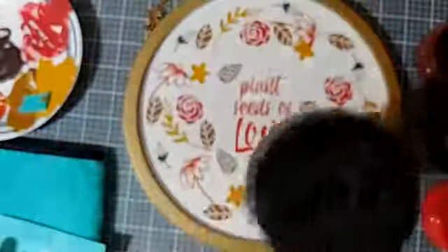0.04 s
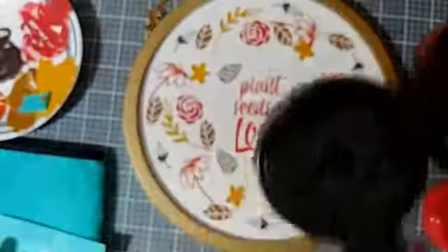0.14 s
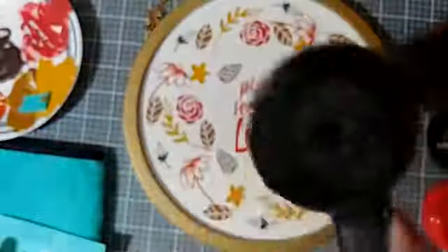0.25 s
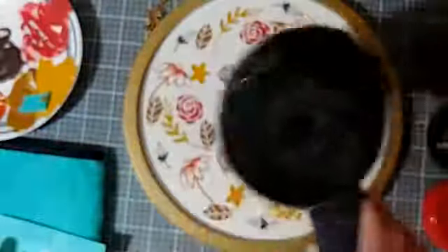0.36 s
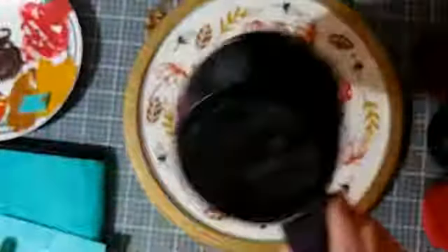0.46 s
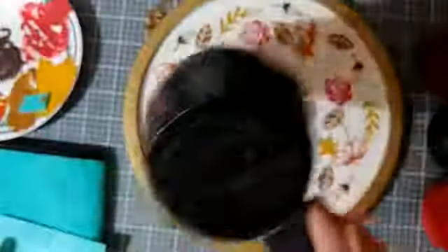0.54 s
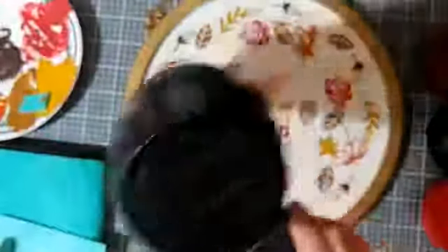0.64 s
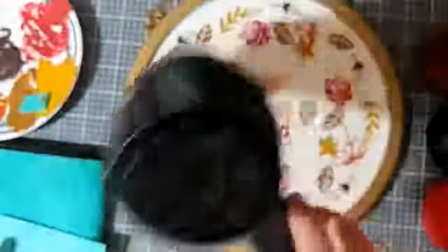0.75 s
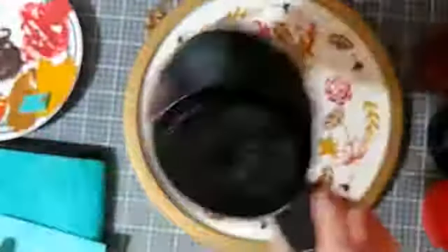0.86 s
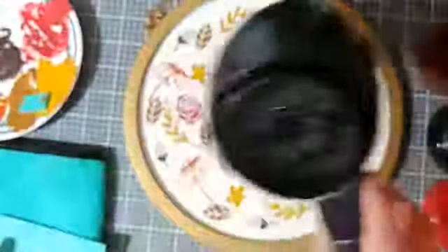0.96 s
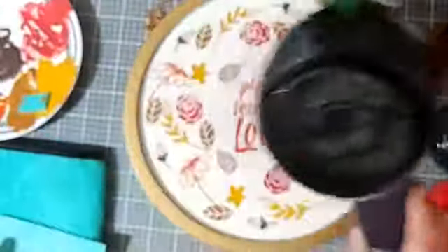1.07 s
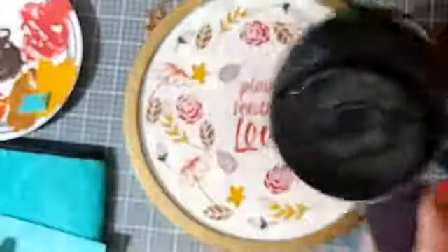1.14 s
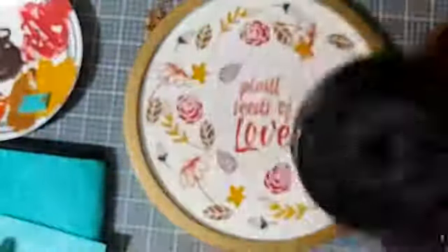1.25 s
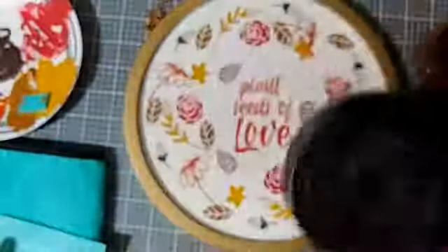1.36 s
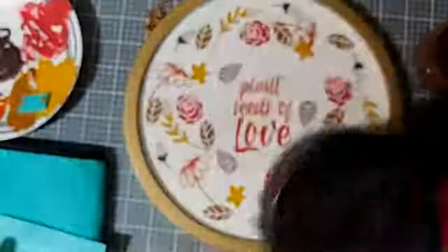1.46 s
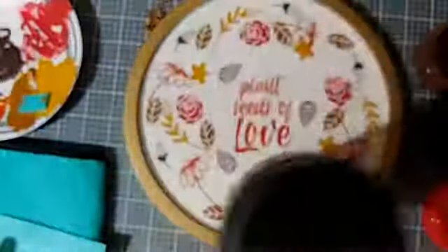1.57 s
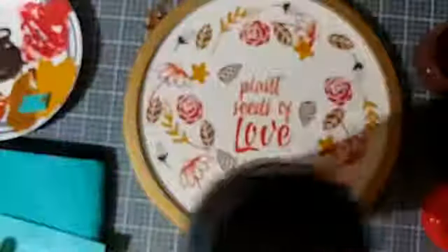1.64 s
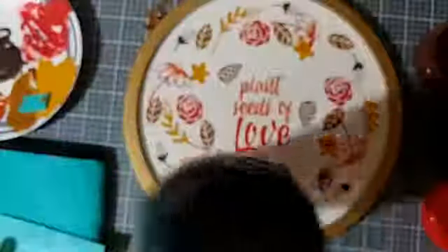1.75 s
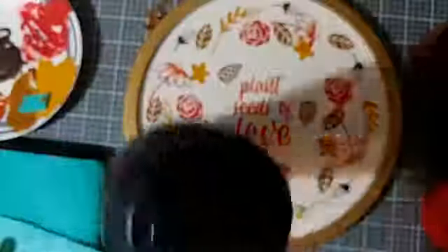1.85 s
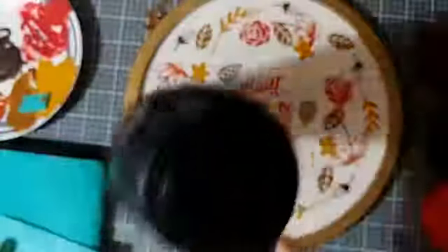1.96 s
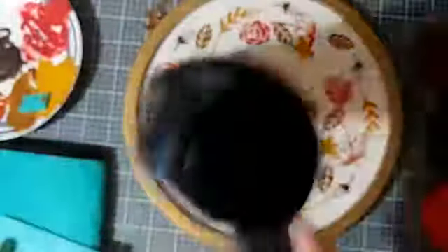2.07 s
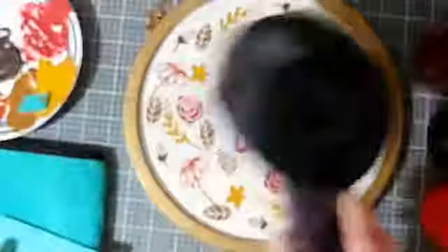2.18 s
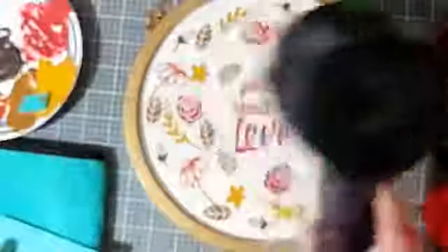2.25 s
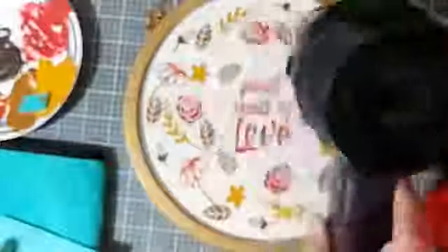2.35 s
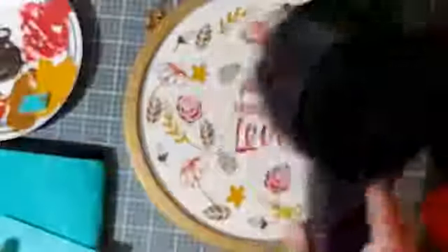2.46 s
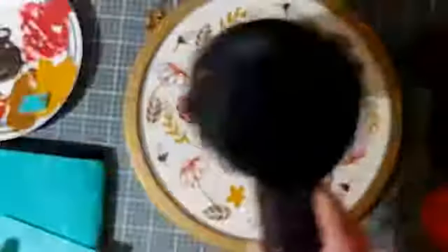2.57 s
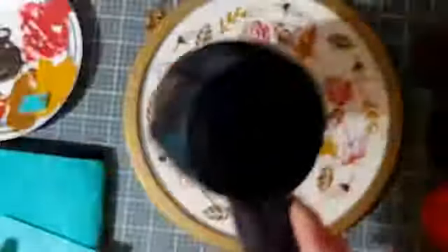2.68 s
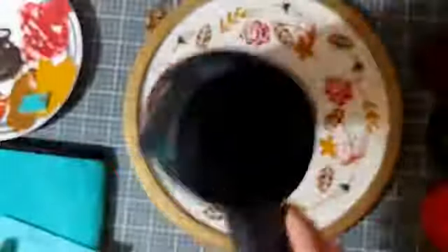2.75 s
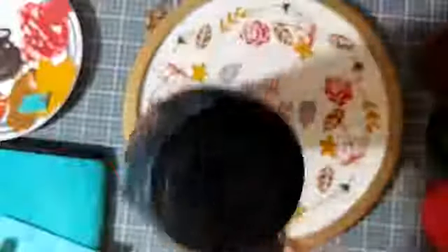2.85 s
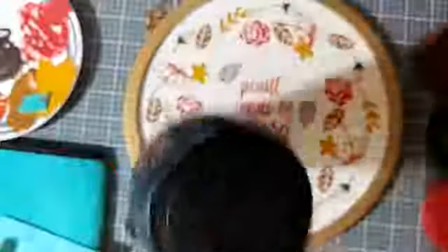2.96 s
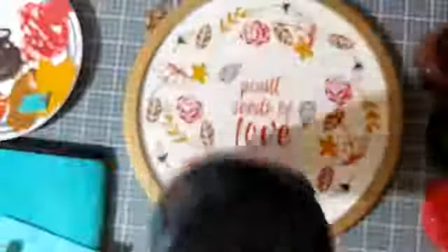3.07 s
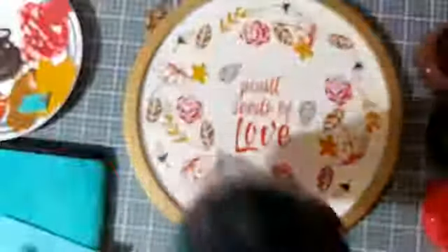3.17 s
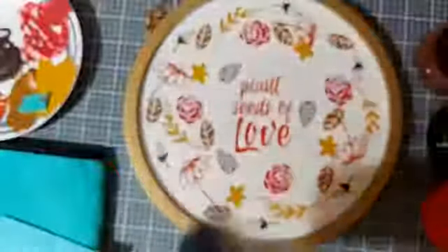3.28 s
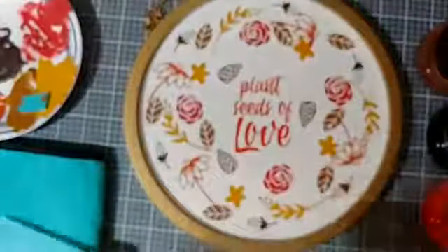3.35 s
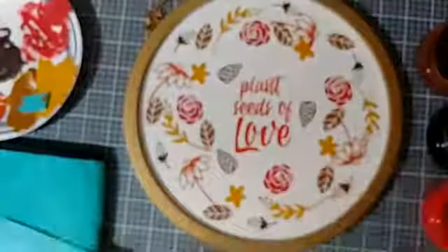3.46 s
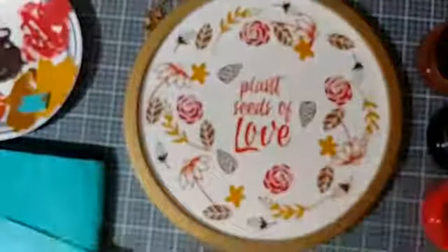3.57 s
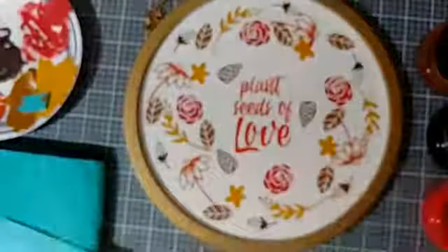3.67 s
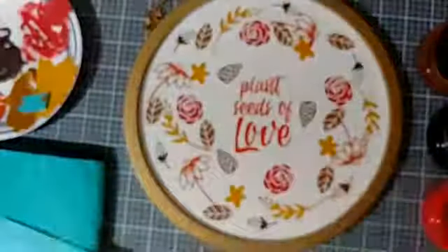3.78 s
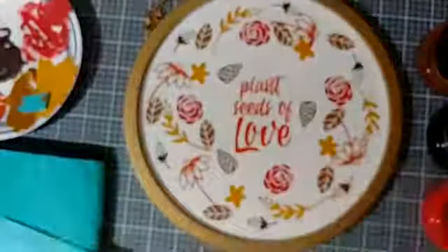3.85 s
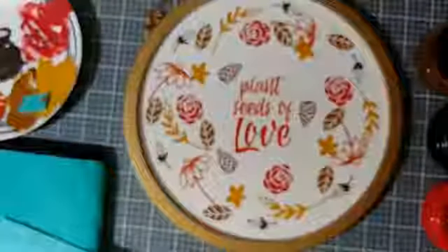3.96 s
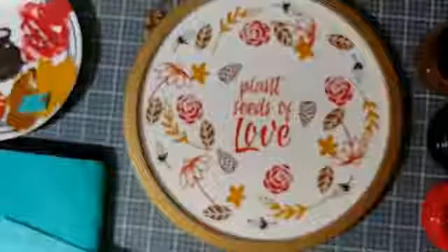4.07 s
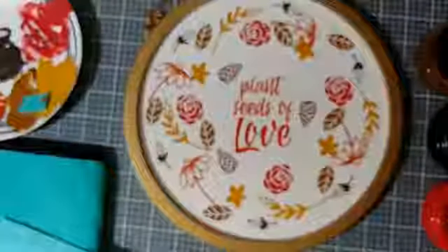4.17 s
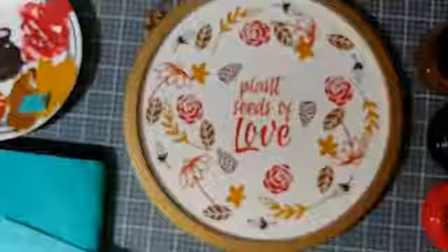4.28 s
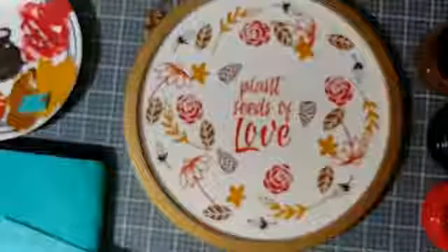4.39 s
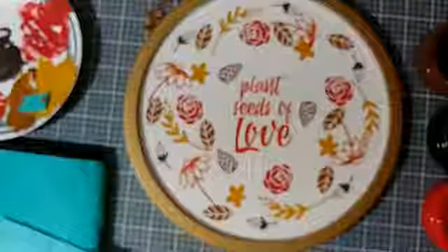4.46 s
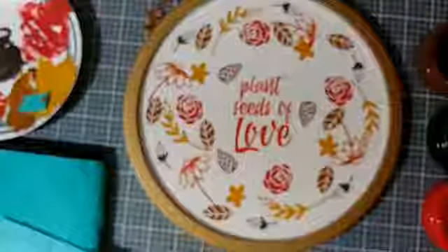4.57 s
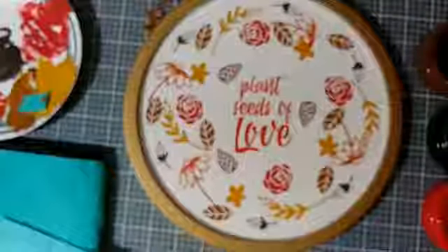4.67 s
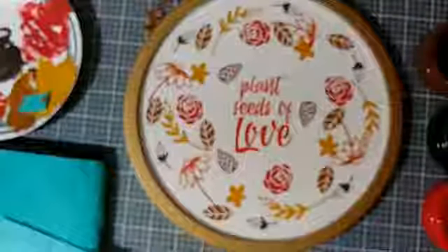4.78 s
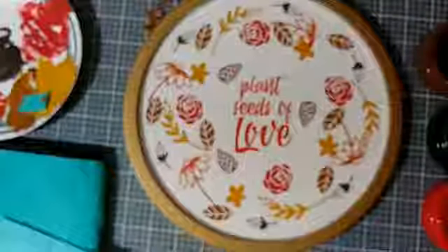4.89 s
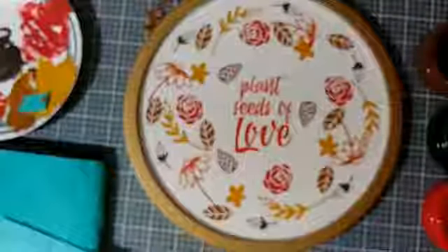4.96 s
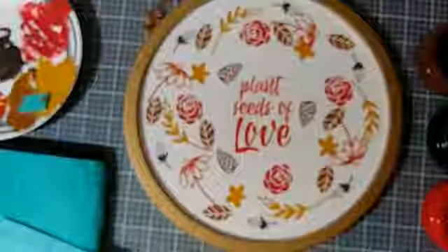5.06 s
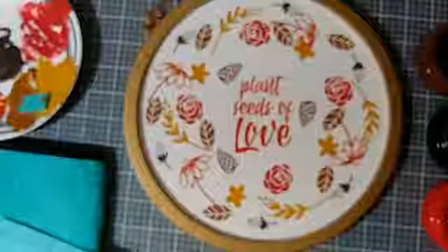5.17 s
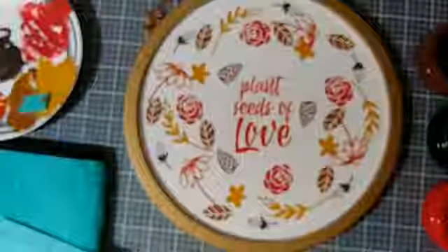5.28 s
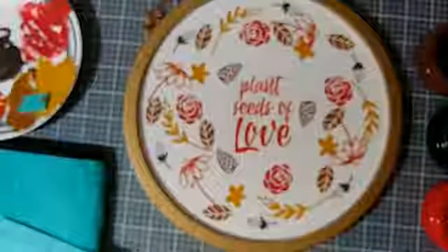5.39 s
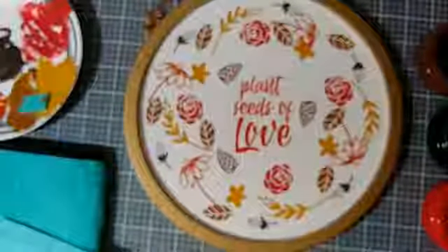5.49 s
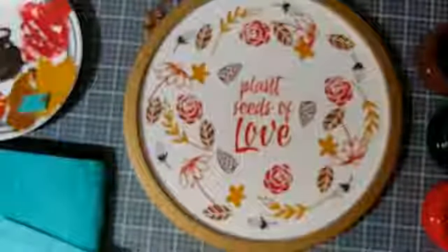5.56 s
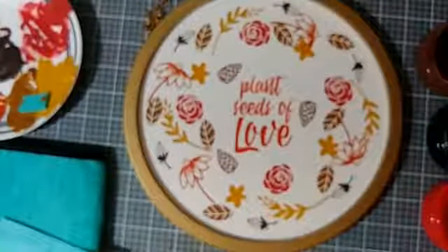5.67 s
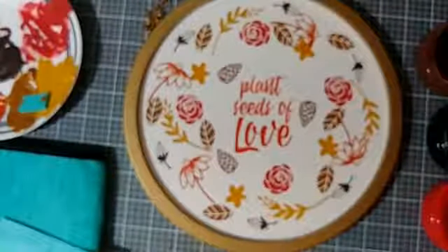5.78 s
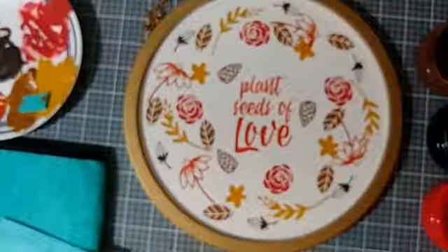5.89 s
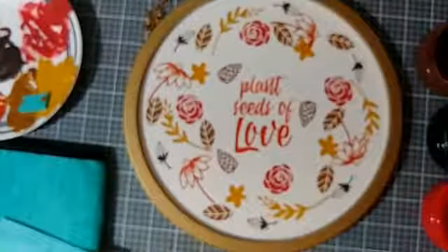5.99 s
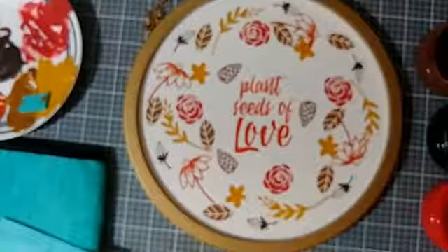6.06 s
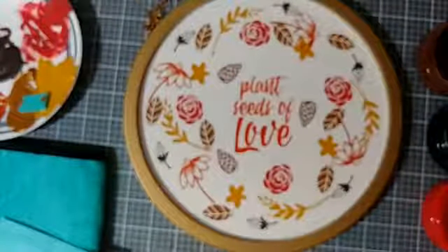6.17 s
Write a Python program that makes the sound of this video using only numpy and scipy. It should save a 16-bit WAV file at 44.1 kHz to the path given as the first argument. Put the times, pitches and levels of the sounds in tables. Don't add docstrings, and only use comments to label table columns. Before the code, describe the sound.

Indoors, close to the microphone, a hair dryer roars with breathy, hissing air and a steady thin whine. Its tone keeps shifting and whistling as it is waved over a board. It grows quieter, switches off and winds down rapidly. After a brief near-quiet with small clicks, it lands on the table in a loud, quick cluster of knocks, followed by faint taps and rubs.

```python
import sys
import numpy as np
from scipy import signal
from scipy.fft import rfft, irfft, next_fast_len
from scipy.io import wavfile
from scipy.ndimage import uniform_filter1d

SR = 44100
rng = np.random.default_rng(int(sys.argv[2]) if len(sys.argv) > 2 else 0)


def to_wav(s):
    ch = np.atleast_2d(s).T
    pcm = np.round(np.clip(ch, -1, 1) * 32767)
    wavfile.write(sys.argv[1], SR, pcm.astype(np.int16))


def attenuation_scalar(level_db):
    decades = np.asarray(level_db, float) / 20
    return 10 ** decades


N = 274743
TIME = np.arange(N) / SR
FREQ = np.maximum(np.linspace(0, SR / 2, next_fast_len(N, True) // 2 + 1), 1)


def unit(x):
    return x / np.sqrt(np.mean(x ** 2))


def curves(table):
    s, *columns = np.transpose(table)
    return [np.interp(TIME, s, column) for column in columns]


def shape(colour):
    hz, db = np.transpose(colour)
    return attenuation_scalar(np.interp(np.log(FREQ), np.log(hz), db, left=-120, right=-120))


def noise(gain):
    real = rng.standard_normal(len(FREQ))
    imaginary = rng.standard_normal(len(FREQ))
    return irfft(gain * (real + 1j * imaginary))[:N]


def ring(hz, width):
    return 1 / np.sqrt(1 + ((FREQ ** 2 - hz ** 2) / (FREQ * width)) ** 2)


def walk(rate):
    k = int(SR / rate)
    steps = np.repeat(rng.standard_normal(N // k + 1), k)
    return unit(uniform_filter1d(uniform_filter1d(steps, k), k)[:N])


def bands(colour, lo, hi):
    gain = shape(colour)
    count = int(3 * np.log2(hi / lo)) + 1
    for hz in lo * 2 ** (np.arange(count) / 3):
        thirds = np.clip(3 * np.log2(FREQ / hz), -1, 1)
        yield hz, gain * np.cos(np.pi / 2 * thirds)


def bell(s, spread):
    return np.exp(-.5 * ((TIME - s) / spread) ** 2)


def running(end_s):
    return np.clip((end_s - TIME) / 0.11, 0, 1)


def modes(t, table, stretch):
    return sum(attenuation_scalar(db - 60 * t / (t60 * stretch)) * np.sin(2 * np.pi * hz * t) for hz, db, t60 in table)


def walls(x):
    level_db, t60_s = -8, 0.35
    t = TIME[:SR // 2]
    echo = rng.standard_normal(len(t)) * attenuation_scalar(-60 * t / t60_s) * (t > .002)
    return x + attenuation_scalar(level_db) * signal.fftconvolve(x, echo / np.sqrt(np.sum(echo ** 2)))[:N]


def room():
    # hz, density_db
    room_colour = [(250, -5), (320, -23.5), (510, -9), (720, -16), (900, -15), (1400, -20.5), (2400, -28.5),
                   (3200, -26), (4700, -32), (5900, -19.5), (6600, -28), (7700, -41), (10000, -43),
                   (14600, -43)]
    out = sum(noise(gain) * attenuation_scalar(1.2 * walk(6)) for hz, gain in bands(room_colour, 250, 15000))
    return unit(out) * attenuation_scalar(-59.5)


def hum():
    # hz, density_db
    hum_colour = [(15, -46), (25, -17.5), (91, -5.5), (118, 1.5), (135, 1), (150, -18.5), (184, -3),
                  (219, -14.5), (257, -15.5), (281, -33.5), (330, -18), (430, -63), (730, -120)]
    # start_s, level_db
    nudges = [(.06, -59), (.51, -49), (.77, -56), (.84, -52), (1.12, -46), (1.2, -53), (1.54, -53),
              (1.79, -64), (2.15, -39), (2.47, -54), (2.54, -51), (2.93, -52), (3.21, -52), (3.37, -52),
              (3.7, -47), (3.94, -42.5), (4.08, -45), (4.5, -56), (4.93, -53), (5.03, -50), (5.502, -42.5),
              (5.642, -55), (5.85, -47.5), (5.938, -37)]
    # start_s, change_db
    leans = [
        (5.77, -8),
        (6.27, -10),
    ]
    level_db, wander_db, lean_s, nudge_s = -54.5, 0.4, 0.035, 0.026
    leaning_db = sum(db * bell(s, lean_s) for s, db in leans)
    steady = attenuation_scalar(level_db + wander_db * walk(6) + leaning_db)
    nudged = sum(attenuation_scalar(db - 7) * bell(s, nudge_s) for s, db in nudges)
    return unit(noise(shape(hum_colour))) * (steady + nudged)


def ticks():
    # start_s, peak_db, centre_hz, width_hz, t60_s
    clicks = [(4.3878, -40, 6000, 4960, 0.035), (4.6795, -39, 6250, 1500, 0.044),
              (4.685, -47, 6260, 1800, .18), (4.769, -47, 6200, 4000, .02), (4.961, -50, 6200, 2970, .03),
              (5.0007, -54, 2180, 2500, 0.12), (5.335, -36, 6100, 1500, 0.18), (5.43, -41, 945, 1540, 0.34),
              (5.409, -28, 121, 60, 0.23), (5.6444, -54, 5960, 3000, .05),
              (5.7063, -49.5, 6000, 2970, 0.24), (5.722, -52, 12900, 2200, 0.27),
              (5.827, -51, 500, 150, .1), (6.201, -49, 6000, 3000, 0.027)]
    out = np.zeros(N)
    for s, db, hz, width, t60 in clicks:
        t = np.maximum(TIME - s, 0)
        envelope = attenuation_scalar(db - 6.5 - 60 * t / t60) * (1 - np.exp(-t / 0.0007))
        out += envelope * unit(noise(ring(hz, width) ** 3))
    return out


def knocks():
    # start_s, snap_db, table_db, housing_db, crack_db
    contacts = [
        (5.1597, -13, -4.5, -13.5, -6),
        (5.2586, -6.5, -6.5, -31, -17.5),
        (5.2986, -12.5, -15, -11.5, -16.5),
        (5.3215, -17, -16.5, -20.5, -34),
    ]
    # pitch_hz, level_db, share_of_t60
    table_modes = [(128, 0, 1.57), (89.6, -15.5, 1.6), (160, -7, 0.34), (191, -4.5, 0.74), (250, -16, 0.61)]
    # pitch_hz, level_db, t60_s
    housing_modes = [(320, 6.5, 0.028), (409, 9, 0.062), (506, 3, 0.15), (640, -3.5, 0.096),
                     (780, 0, 0.023), (886, -6.5, 0.11), (1100, -19.5, .03), (1430, -10, 0.076)]
    crack_modes = [(2130, -6, 0.028), (2700, -14, 0.045), (3700, 5.5, 0.0079), (4250, 1, 0.013)]
    port_modes = [(6200, 7, 0.011), (5930, -7, 0.026), (6600, -21, 0.034)]
    # pitch_hz, level_db, t60_s
    tap_modes = [(442, -3, 0.081), (616, 2, 0.085), (884, 2.5, 0.038), (986, 3, 0.054), (1150, -16, 0.033),
                 (1500, -20, .03), (3300, -16, .015), (6100, -13, .015)]
    # hz, density_db
    tail_colour = [(180, -34), (300, -8.5), (408, -7.5), (675, -14.5), (769, -19.5), (919, -19),
                   (1570, -28.5), (3480, -23), (4360, -29), (5840, -8.5), (7700, -23), (12100, -39),
                   (14500, -40)]
    landed_s, bounce_t60_s, landed_t60_s = 5.28, 0.088, 0.29
    still_s = 5.371
    tap_s, tap_db = 5.4282, -33

    out = np.zeros(N)
    rattle = unit(noise(shape(tail_colour))) * attenuation_scalar(1.6 * walk(250))
    dull = signal.sosfilt(signal.butter(3, 7500, fs=SR, output="sos"), rattle)
    for s, port_db, table_db, housing_db, crack_db in contacts:
        table_t60 = bounce_t60_s if s < landed_s else landed_t60_s
        i = int(s * SR) + 1
        t = TIME[i:] - s
        stilled = attenuation_scalar(-1100 * np.maximum(TIME[i:] - still_s, 0)) if s < still_s else 1
        push = 1 - np.exp(-(t / 0.00037) ** 2)
        swing = 1 - np.exp(-t / 0.012)
        out[i:] += attenuation_scalar(table_db) * modes(np.maximum(t - .0013, 0), table_modes, table_t60) * stilled * swing
        out[i:] -= attenuation_scalar(housing_db - 15.5) * modes(np.maximum(t - .0007, 0), housing_modes, 1.0)
        snap = attenuation_scalar(port_db) * modes(t, port_modes, 0.62)
        crack = attenuation_scalar(crack_db - 5.0) * modes(t, crack_modes, 0.87)
        out[i:] += push * (snap + crack)
        fading = rattle[i:] * (attenuation_scalar(-23 - 60 * t / 0.0087) + attenuation_scalar(-27.5 - 60 * t / 0.2))
        fading += dull[i:] * attenuation_scalar(-29.5 - 60 * t / 0.19)
        out[i:] += (attenuation_scalar(port_db) + 2.46 * attenuation_scalar(crack_db)) * push * fading
    t = np.maximum(TIME - tap_s, 0)
    return out - attenuation_scalar(tap_db) * modes(t, tap_modes, 0.75) * (1 - np.exp(-(t / 0.0004) ** 2))


def whine():
    # start_s, blade_rate_hz
    fan = [(0, 1068), (1, 1066), (4.235, 1065), (4.28, 950), (4.32, 840), (4.45, 700)]
    # multiple, level_db
    harmonics = [(2, -63), (3, -66), (4, -70), (5, -67), (6, -65)]
    # start_s, level_db
    turning = [(0, -51), (.4, -51.5), (.5, -53.5), (1.1, -49), (1.22, -55), (1.89, -55), (2.2, -41),
               (2.33, -44), (2.4, -54), (2.47, -45.5), (2.55, -52), (2.65, -42.5), (2.72, -48),
               (3.4, -54.5), (3.57, -46.5), (3.8, -49), (3.97, -51.5), (4.2, -49.5)]
    run_down = [(4.25, -54), (4.28, -45), (4.31, -62), (4.36, -72), (4.45, -78)]
    hz, = curves(fan)
    phase = 2 * np.pi * np.cumsum(hz * (1 + 0.0017 * walk(39.9))) / SR
    level_db, = curves(turning + run_down)
    blade = attenuation_scalar(level_db + 2.0 + 1.9 * walk(14)) * np.sin(phase)
    upper = sum(attenuation_scalar(db + 4 * walk(4)) * np.sin(k * phase) for k, db in harmonics)
    upper = upper * (hz / hz[0]) ** 8
    return np.sqrt(2) * (blade + upper) * running(4.45)


def gap():
    # start_s, centre_hz, level_db, spread_s
    gap_rings = [(2.43, 1755, -49.5, 0.19), (0.13, 780, -50, .22), (0.22, 640, -48, .093),
                 (.52, 664, -50.5, 0.12), (.62, 1900, -47.5, .09), (.75, 2560, -52.5, 0.18),
                 (0.76, 3100, -44.5, 0.032), (.06, 1300, -50.5, 0.12), (0.88, 605, -51, 0.056),
                 (1.18, 640, -47, 0.053), (0.37, 990, -52, 0.16), (2.16, 500, -53.5, 0.12),
                 (1.39, 3340, -44, 0.12), (1.42, 4120, -47, 0.16), (1.74, 895, -45, 0.028),
                 (1.98, 2720, -49, 0.099), (1.98, 870, -48, .036), (1.87, 1990, -48.5, .15),
                 (2.21, 1110, -45.5, 0.088), (2.38, 3360, -46.5, 0.071), (2.47, 4280, -46, 0.15),
                 (3.82, 1260, -51.5, .12), (2.9, 1400, -49, 0.04), (2.9, 2150, -47.5, 0.18),
                 (3.19, 2660, -51, .15), (3.22, 703, -52, 0.071), (3.52, 934, -42.5, 0.082),
                 (3.52, 3130, -44, 0.04), (3.7, 1040, -48.5, 0.12), (4, 1050, -50.5, 0.13)]
    # start_s, centre_hz, level_db
    puffs = [
        (1.19, 3700, -39.5),
        (1.33, 4870, -40),
    ]
    # start_s, level_db, spread_s
    whistles = [
        (.92, -43.5, 0.062),
        (1.1, -41.5, 0.066),
        (1.23, -41.5, 0.072),
        (3.28, -42, 0.085),
        (3.44, -36.5, 0.061),
    ]
    gap_q, puff_q, whistle_q = 8.5, 2.5, 10.4
    puff_s, whistle_hz = 0.0087, 1710
    rows = [(gap_q, *row) for row in gap_rings]
    rows += [(puff_q, *row, puff_s) for row in puffs]
    rows += [(whistle_q, s, whistle_hz, db, spread) for s, db, spread in whistles]
    jet = rfft(rng.standard_normal(2 * len(FREQ) - 2))
    out = 0
    for q, s, hz, db, spread in rows:
        tone = unit(irfft(jet * ring(hz, hz / q) ** 2)[:N])
        out = out + attenuation_scalar(db) * bell(s, spread) * tone
    return out


def air():
    # start_s, hiss_db, tilt_db (as the nozzle turns to the board)
    waving = [(0, -39.5, 1), (.3, -38.5, -5), (.8, -41, 4), (1.04, -38, 4.5), (1.24, -40, 5),
              (1.35, -38.5, 5), (1.6, -38, -0.5), (1.8, -40, 2.5), (2.15, -40.5, 1), (2.42, -40, 0),
              (2.63, -41.5, 2), (3.06, -40.5, -7.5), (3.12, -38, -3), (3.46, -40, -3), (3.55, -44, -6),
              (4.05, -47.5, -3.5), (4.24, -45.5, -2)]
    # hz, density_db
    air_colour = [(250, -19), (430, -19), (640, -8.5), (1040, -6.5), (1500, -8.5), (2050, -10), (2420, -18),
                  (3100, -9.5), (4900, -11.5), (5900, 0.5), (6700, -7), (7900, -22), (10000, -26),
                  (14600, -27)]
    # centre_hz, share of hiss_db, share of tilt_db, coast_db (drop after switch-off)
    zones_hz = [6000, 620, 2500, 11000]
    beam_share = [0.92, 0.54, 0.46, 0.46]
    tilt_share = [0.064, 0.46, -0.35, -0.0013]
    coast_db = [-32.5, -14.5, -29, -32]
    off_s, coast_s = 4.217, 0.21
    hiss_db, tilt_db = curves(waving)
    mean_db = np.mean(np.transpose(waving)[1])
    coast = 1 - np.exp(-(np.maximum(TIME - off_s, 0) / coast_s) ** 1.63)
    moves_db = np.outer(beam_share, hiss_db - mean_db) + np.outer(tilt_share, tilt_db)
    moves_db += np.outer(coast_db, coast)
    moves_db = moves_db[np.argsort(zones_hz)]
    log_zones = np.log(np.sort(zones_hz))
    out, gust = 0, walk(8.82)
    for hz, gain in bands(air_colour, 250, 15000):
        share = np.array([np.interp(np.log(hz), log_zones, row) for row in np.eye(4)])
        calm = min(1, (2500 / hz) ** .8)
        flicker_db = calm * (1.7 * walk(5.33) + 2.1 * walk(30.16))
        out = out + noise(gain) * attenuation_scalar(share @ moves_db + 0.74 * gust + flicker_db)
    return unit(out) * attenuation_scalar(mean_db + 0.81) * running(4.65)


def scene():
    return (room() + hum() + ticks() + knocks() + whine() + walls(gap() + air()))[None]


def top_cut(x):
    return signal.sosfilt(signal.butter(12, 14760, fs=SR, output="sos"), x)


def record(dry):
    ceiling = .62
    low = signal.butter(2, 40, "high", fs=SR, output="sos")
    top = signal.ellip(10, .2, 70, 14150, fs=SR, output="sos")
    rounded = ceiling * np.tanh(dry / ceiling)
    return top_cut(signal.sosfilt(np.vstack([low, top]), rounded))


dry = scene()
out = record(dry)
to_wav(out)
```